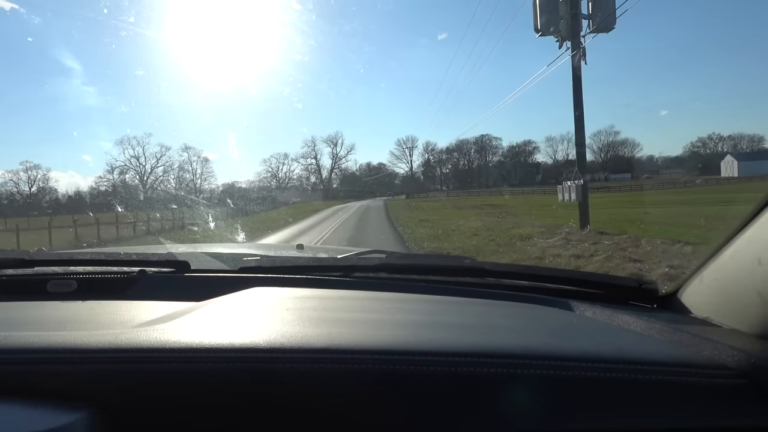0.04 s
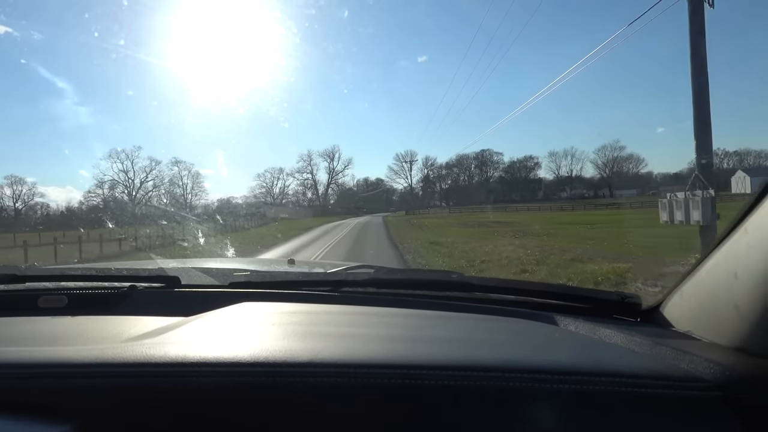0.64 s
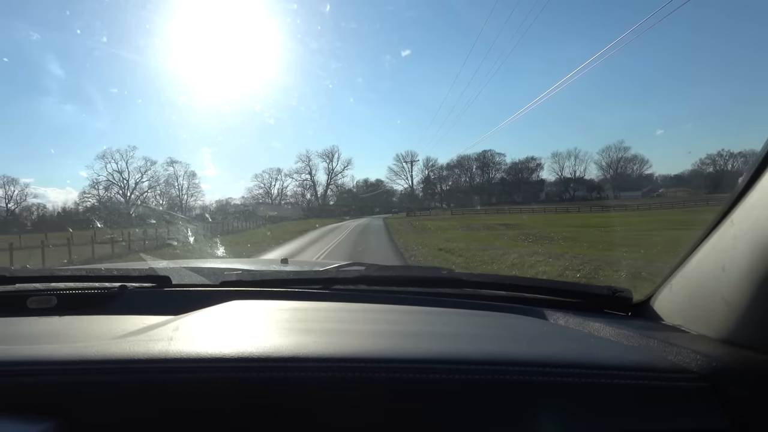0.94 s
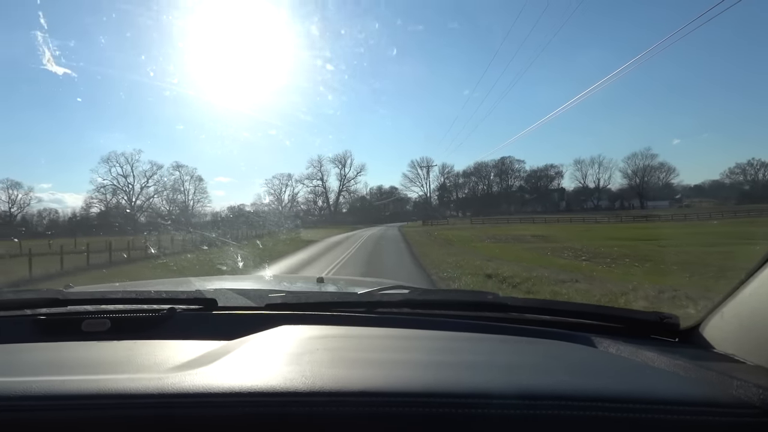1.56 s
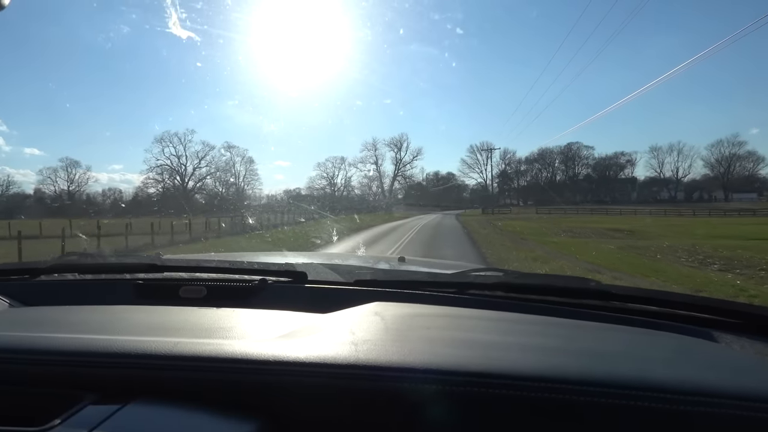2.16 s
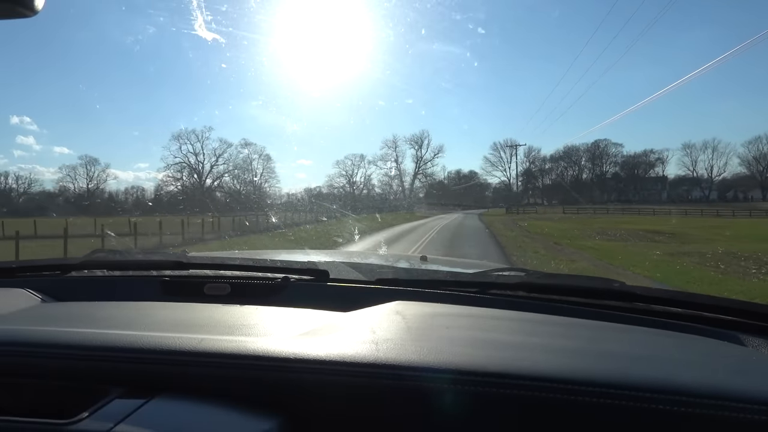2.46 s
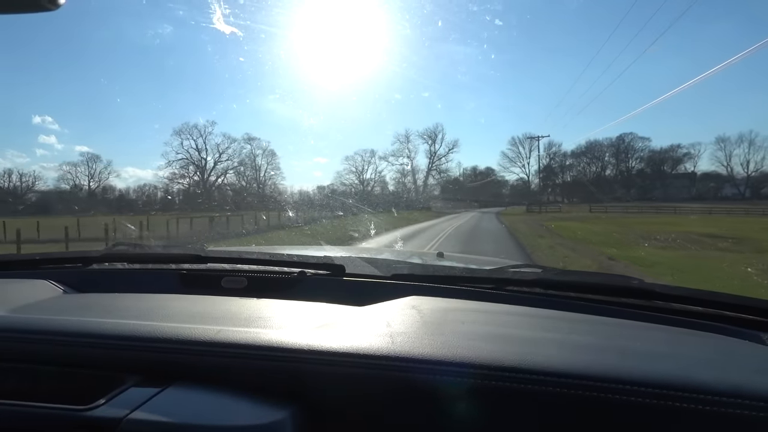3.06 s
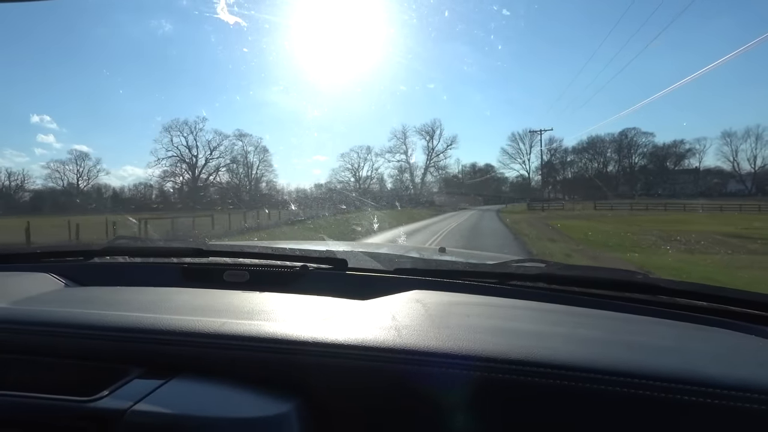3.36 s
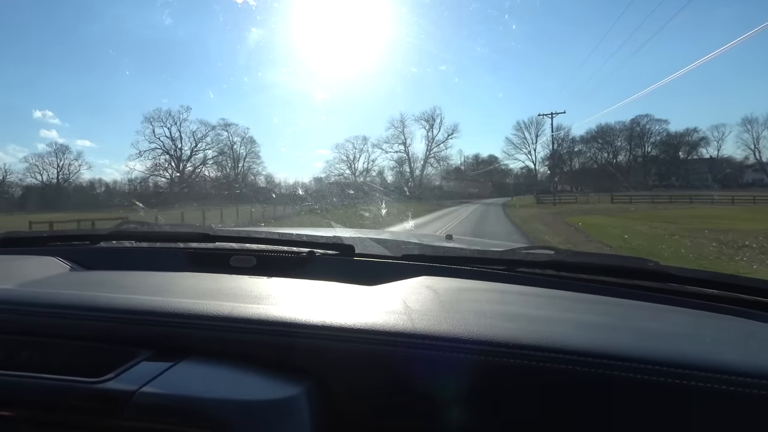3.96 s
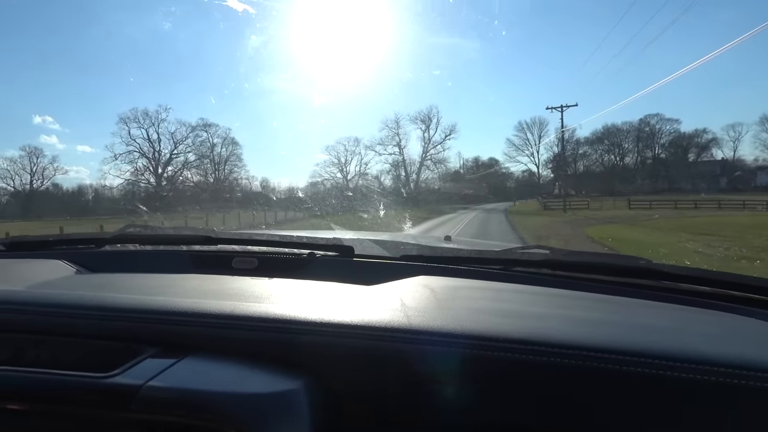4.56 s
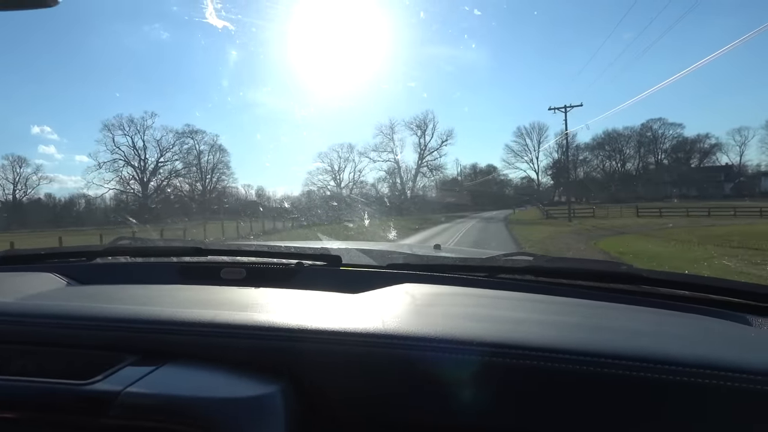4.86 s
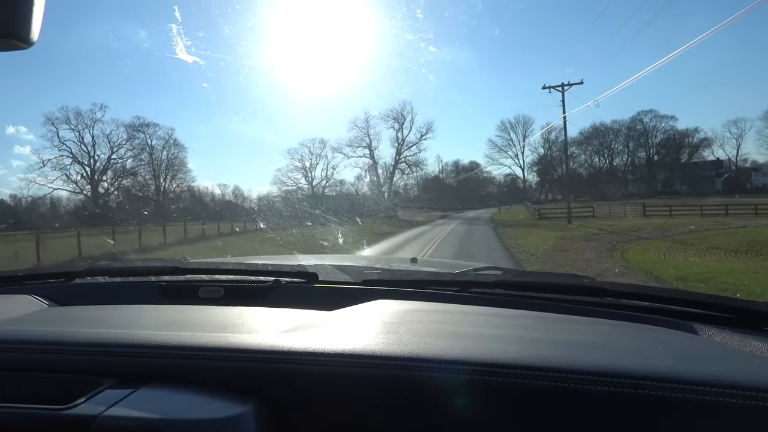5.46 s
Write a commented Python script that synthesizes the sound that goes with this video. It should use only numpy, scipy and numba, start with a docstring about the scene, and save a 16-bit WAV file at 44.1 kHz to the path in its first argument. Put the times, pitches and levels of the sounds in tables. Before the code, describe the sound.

A diesel pickup drones inside the cab, swelling to a loud exhaust boom as the revs climb, then dropping back over road rumble.

```python
"""The exhaust of a six-cylinder diesel pickup, heard inside the cab on a country road. It drones at the
firing rate and its harmonics, booms as the engine speeds up, and drops away as the revs fall. The firings
also excite diesel clatter and ringing covers and panels. Around them are road rumble, intake hiss, a thin
gear whine, a few knocks of loose trim and one rasping whoosh of air from the turbo.
An automatic gain control ducks all of this under the boom."""
import sys
import numpy as np
from scipy import signal
from scipy.fft import rfft, irfft
from scipy.io import wavfile
from numba import njit

SR = 44100
rng = np.random.default_rng(int(sys.argv[2]) if len(sys.argv) > 2 else 0)


def to_wav(sig):
    """Store sig (one row per channel, or 1-D mono) as 16-bit WAV at the path in sys.argv[1].

    Samples outside -1..1 are clipped; the rate is SR.
    """
    pcm = np.clip(np.atleast_2d(sig), -1, 1) * 32767
    pcm = np.round(pcm).astype(np.int16)
    wavfile.write(sys.argv[1], SR, pcm.T)  # frames by channels


N = 251811
TIME = np.arange(N) / SR
FREQ = np.maximum(np.arange(N // 2 + 1) * SR / N, 1)


def undb(db):
    """Decibels to amplitude ratio."""
    return 10 ** (np.asarray(db) / 20)


def curves(table):
    """Linear interpolation in time of each column after the first."""
    time_s, *columns = np.transpose(table)
    return [np.interp(TIME, time_s, column) for column in columns]


def over_hz(table):
    """Linear interpolation on a log-frequency axis."""
    hz, value = np.transpose(table)
    return np.interp(np.log(FREQ), np.log(hz), value)


def walk(cutoff_hz):
    """Low-pass Gaussian noise of unit variance."""
    noise = irfft(rfft(rng.standard_normal(N)) / (1 + (FREQ / cutoff_hz) ** 4), N)
    return (noise - noise.mean()) / noise.std()


def burst(start_s, rise_s, fall_s, hold_s=0):
    """Envelope: exponential growth to 1 at start_s, a hold, then exponential decay."""
    age = TIME - start_s
    return np.exp(np.minimum(0, np.minimum(age / rise_s, (hold_s - age) / fall_s)))


def resonances(modes):
    """Modal superposition: the summed frequency response of damped resonances."""
    return sum(undb(db) / (1 + 2j * (FREQ - hz) / width) ** 2 for hz, width, db in modes)


def cab_noise(response, drive=1):
    """Partial coherence: filtered noise of rms 1; reflections off the glass make left and right differ."""
    # likeness of the two channels: frequency_hz, correlation
    likeness = [(60, 0.9), (250, 0.74), (500, 0.73), (1000, 0.5), (4000, 0.97), (8000, 0.29), (14000, .5)]
    correlation = over_hz(likeness)
    mid, side = rfft(rng.standard_normal((2, N)) * drive)
    stereo = mid * np.sqrt(1 + correlation) + side * np.sqrt(1 - correlation) * np.array([[1], [-1]])
    noise = irfft(response * stereo, N)
    return noise / noise.std()


def road(level_db=-20.5, bumps_db=-0.5, tread_share=0.36):
    """Rolling noise: the tread roar gets louder after 2 s; rumble from uneven tarmac partly follows it."""
    # floor rumble spectrum: frequency_hz, relative_db
    rumble_spectrum = [(12, -16.5), (25, -1), (40, -5), (55, -7), (80, 0), (120, -0.5), (160, -3.5),
                       (215, -1), (290, -10), (500, -19), (1500, -49.5), (9000, -55), (15000, -70.5)]
    # tyre tread spectrum: frequency_hz, relative_db
    tread_spectrum = [(200, -5), (310, -1.5), (410, -2), (490, -0.5), (580, -6.5), (700, -4), (900, -7),
                      (1080, -1.5), (1200, -6.5), (1310, -4.5), (1450, -15), (2400, -32), (4600, -13),
                      (6500, -33), (14000, -58)]
    # tread noise envelope: time_s, level_db
    rolling = [(0, -42), (1.6, -46.5), (2.6, -30), (3.9, -32.5), (4.8, -26), (5.71, -31.5)]
    tread_db = curves(rolling)[0]
    rumble_db = level_db + tread_share * (tread_db - tread_db.mean()) + bumps_db * walk(4.0)
    rumble = undb(rumble_db) * cab_noise(undb(over_hz(rumble_spectrum)))
    return rumble + undb(tread_db) * cab_noise(undb(over_hz(tread_spectrum)))


def road_swell(level_db=-29, centre_hz=1020, width_hz=420):
    """Band-pass noise: the roar of the road swells briefly in the middle register."""
    envelope = burst(start_s=1.53, rise_s=.03, fall_s=0.059)
    return undb(level_db) * envelope * cab_noise(resonances([(centre_hz, width_hz, 0)]))


def intake_hiss(firings, level_db=-35, pulsing=0.065, flicker_db=0.7):
    """Flow noise in the intake, amplitude-modulated by the cylinders, with thin resonances on top."""
    # rushing air spectrum: frequency_hz, relative_db
    hiss_spectrum = [(1000, -5.5), (2200, -12.5), (2750, -4.5), (3100, -0.5), (3600, 2), (5000, 2.5),
                     (5900, -6.5), (7000, -7.5), (10500, -12.5), (12500, -17), (14000, -17), (16000, -27)]
    # slow drift of the hiss: time_s, relative_db
    airflow = [(0, -0.5), (.9, 0), (1.7, 0.1), (3.0, -0.5), (4.2, -1), (5.0, 0.5), (5.71, 0.5)]
    # metallic rings of the engine and an airy band of the intake: centre_hz, width_hz, level_db
    rings = [(3440, 40, -57.5), (3720, 37, -54), (4550, 70, -57), (6750, 700, -61), (10480, 650, -59.5)]
    drive = (1 + pulsing * np.cos(2 * np.pi * firings)) * undb(curves(airflow)[0] + flicker_db * walk(27))
    hiss = undb(level_db) * cab_noise(undb(over_hz(hiss_spectrum)), drive)
    ring_response = sum(undb(db) / np.sqrt(width) / (1 + (2 * (FREQ - hz) / width) ** 2)
                        for hz, width, db in rings)
    ring_rms = np.sqrt(sum(undb(db) ** 2 for _, _, db in rings))
    return hiss + ring_rms * cab_noise(ring_response)


def gear_whine(jitter_hz=7, flicker_db=2.0, fringe_db=-9, fringe_hz=70):
    """Gear meshing: one wavering tone with airy noise sidebands, strongest around 3 s."""
    # driveline tone: time_s, pitch_hz, level_db
    mesh = [(0, 5206, -84.5), (2.3, 5225, -58), (2.65, 5245, -58), (3.0, 5302, -44.5), (3.3, 5284, -46),
            (3.6, 5282, -53), (4.33, 5279, -51.5), (4.62, 5256, -56), (5.05, 5273, -51), (5.71, 5242, -59)]
    hz, db = curves(mesh)
    phase = 2 * np.pi * np.cumsum(hz + jitter_hz * walk(77)) / SR
    fringe = undb(fringe_db) * (walk(fringe_hz) * np.sin(phase) + walk(fringe_hz) * np.cos(phase))
    return undb(db + flicker_db * walk(16)) * (np.sqrt(2) * np.sin(phase) + fringe)


def trim_knocks(ring_s=0.0081, tick_db=-9, tick_s=0.004):
    """Impact excitation: loose trim strikes the dashboard, each time with a dull tick and a damped ring."""
    # faint impacts: start_s, pitch_hz, level_db
    knocks = [(2.708, 850, -19), (2.748, 2025, -28), (2.798, 740, -17), (2.813, 703, -19),
              (2.842, 1400, -26), (2.857, 690, -15.5), (2.880, 2005, -28)]
    out = 0
    for start_s, hz, db in knocks:
        age = np.maximum(TIME - start_s, 0)
        tick = undb(tick_db) * (age > 0) * np.exp(-age / tick_s) * walk(2000)
        ring = np.exp(-age / ring_s) * np.sin(2 * np.pi * hz * age)
        out = out + undb(db) * (ring + tick)
    return out


def turbo_whoosh(firings, pulsing=0.15, grit_db=1.1, leak_db=-33.0, leak_jet_db=-41, jet_delay_s=0.018):
    """Jet noise: spurts of air that end brighter, over a softer leak, chopped by firings and turbulence."""
    # body of the escaping air: frequency_hz, relative_db
    body_spectrum = [(1200, -35), (2300, -8), (2850, -2), (3550, 5.5), (4200, 0), (4700, 0.5), (5700, -22),
                     (7200, -12), (12000, -32)]
    # its bright jet: frequency_hz, relative_db
    jet_spectrum = [(3000, -9), (5000, -2.5), (7200, 6.5), (8500, -0.5), (10500, -3), (12500, -10),
                    (15500, -29)]
    # spurts from the turbo: start_s, length_s, body_db, jet_db
    spurts = [(1.75, 0.025, -33, -46), (1.833, 0.016, -23, -31.5), (1.885, 0.015, -27, -33),
              (1.93, .014, -35, -48.5)]
    drive = (1 + pulsing * np.cos(2 * np.pi * firings)) * undb(grit_db * walk(350))
    leak = burst(start_s=1.947, rise_s=0.35, fall_s=0.076)
    body_envelope, jet_envelope = undb(leak_db) * leak, undb(leak_jet_db) * leak
    for start_s, length_s, body_db, jet_db in spurts:
        body_envelope += undb(body_db) * burst(start_s, rise_s=0.0039, fall_s=0.013, hold_s=length_s)
        jet_s = start_s + jet_delay_s
        jet_envelope += undb(jet_db) * burst(jet_s, rise_s=0.0046, fall_s=0.0064, hold_s=length_s)
    body = body_envelope * cab_noise(undb(over_hz(body_spectrum)), drive)
    return body + jet_envelope * cab_noise(undb(over_hz(jet_spectrum)), drive)


def firing_pulses(firings, decay_cycles, scatter_db):
    """Impulsive excitation: one exponentially decaying pulse of random strength per firing."""
    strength = undb(scatter_db * rng.standard_normal(N))[firings.astype(int)]
    return strength * np.exp(-(firings % 1) / decay_cycles)


def ringing_metal(firings, scatter_db=2.5):
    """Modal response: each firing makes the engine covers rasp and the panels ring."""
    # cover modes: centre_hz, width_hz, relative_db
    cover_modes = [(2756, 150, -2), (2406, 190, -8.5), (3890, 93, -3.5)]
    # their rasp: time_s, level_db
    cover_level = [(0, -50), (.45, -43.5), (1.3, -43), (2.1, -47), (2.6, -48.5), (4.6, -50), (5.71, -47)]
    # panel modes: centre_hz, width_hz, relative_db
    panel_modes = [(690, 55, -1), (1092, 100, -3.5), (1311, 58, -1), (1790, 190, -12)]
    # their ring, strongest as the engine pulls again at low revs: time_s, level_db
    panel_level = [(0, -50), (1.5, -43.5), (4.3, -43.5), (4.9, -33.5), (5.71, -31)]
    out = 0
    for modes, level, decay_cycles in (cover_modes, cover_level, 0.54), (panel_modes, panel_level, 0.45):
        drive = firing_pulses(firings, decay_cycles, scatter_db)
        out = out + undb(curves(level)[0]) * cab_noise(resonances(modes), drive)
    return out


def diesel_clatter(firings, level_db=-25.0, steady=2.0, crank_swing=0.03):
    """Combustion noise: each firing knocks the block, with a strength that varies round the crank."""
    # clatter spectrum: frequency_hz, relative_db
    clatter_spectrum = [(150, 0.5), (300, -6), (420, -5.5), (570, -6.5), (700, -2), (880, -8.5), (1130, -8),
                        (1500, -12.5), (2200, -18), (4000, -25), (9000, -55)]
    pulses = firing_pulses(firings, decay_cycles=0.76, scatter_db=1.5)
    crank = np.cos(2 * np.pi * firings / 3)  # three firings to a turn
    drive = (steady + pulses) * (1 + crank_swing * crank)
    return undb(level_db) * cab_noise(undb(over_hz(clatter_spectrum)), drive)


def engine_block(firings, firing_hz, waver_db=1.5, wander_rad=.18, off_resonance_db=-24):
    """Forced vibration: unequal cylinders shake the block at crank orders that swell at cab resonances."""
    # orders and the resonances they meet: crank_multiple, resonance_hz, width_hz, level_db
    crank_orders = [(2, 55, 33, -34), (4, 87, 34, -36), (4.5, 180, 15, -37), (6, 160, 7.3, -30.5),
                    (5, 170, 66, -36), (7, 183.2, 30, -23.5), (7.5, 191, 20, -30), (7.5, 235.3, 10, -22.5),
                    (8, 204, 13, -32.5), (10, 251, 14, -31), (12, 309, 42, -35), (12, 357, 12.94, -26),
                    (15, 400, 64, -30), (16, 420, 120, -37.5), (17, 430, 46, -36.5), (18, 421, 58, -33.5),
                    (18, 497, 58, -33.5), (21, 615, 45, -34.5), (24, 660, 140, -41.5)]
    amplitudes = {}
    for multiple, resonance_hz, width_hz, db in crank_orders:
        ratio = multiple / 3  # to the firing rate
        detuning = 2 * (ratio * firing_hz - resonance_hz) / width_hz
        response = undb(off_resonance_db) + 1 / (1 + detuning ** 2)
        amplitudes[ratio] = amplitudes.get(ratio, 0) + undb(db) * response
    out = 0
    for ratio, amplitude in amplitudes.items():
        waver = undb(waver_db * walk(3.0))
        phase = 2 * np.pi * (ratio * firings + rng.random()) + wander_rad * walk(3.9)
        out = out + amplitude * waver * np.sin(phase)
    return out


def pipe_boom(firing_hz, lag_s=0.028):
    """Threshold response: each exhaust harmonic's level in dB climbs once the firing rate is high enough."""
    # one row per harmonic: quiet_db, booming_db, threshold_hz, softness_hz, trend_db_per_hz
    harmonics = [(-18, 3.5, 83.42, 1.93, -0.3179), (-19, -6.5, 81.2, 0.5, 0.5139), (-39, -21, 80.4, 0.3, 0)]
    delayed_hz = np.interp(TIME - lag_s, TIME, firing_hz)
    levels_db = []
    for quiet_db, booming_db, threshold_hz, softness_hz, trend in harmonics:
        above_hz = delayed_hz - threshold_hz
        rise_db = (booming_db - quiet_db) / (1 + np.exp(-above_hz / softness_hz))
        levels_db.append(quiet_db + rise_db + trend * above_hz)
    return levels_db


def exhaust(firings, firing_hz, smooth_above_db=-13, slip_cycles=0.16, pipe_hz=85.9, width_hz=3.67):
    """Harmonic series: three partials of the firing rate; in the boom only the third stays rough."""
    # gain on the whole exhaust note: time_s, gain_db
    exhaust_gain = [(0, 1), (1.2, -0.5), (1.8, -0.5), (2.2, -0.7), (2.75, -2.1), (3.2, 0.2), (4.47, 0.37),
                    (4.55, -2), (4.62, 4), (5.0, 1.7), (5.71, 0.5)]
    levels_db = pipe_boom(firing_hz)
    low_roughness = 0.031 * np.minimum(1, undb(smooth_above_db - levels_db[0]))
    roughness = (low_roughness, low_roughness, 0.18)
    # the overtones slip in phase as the firing rate passes a resonance of the pipe
    slip = slip_cycles * (1 - 2 * np.exp(-((firing_hz - pipe_hz) / width_hz) ** 2))
    note = 0
    for harmonic, (db, depth) in enumerate(zip(levels_db, roughness), 1):
        phase = 2 * np.pi * (harmonic * firings + (harmonic - 1) * slip)
        note = note + undb(db) * (1 + depth * walk(30)) * np.sin(phase)
    return np.sqrt(2) * undb(curves(exhaust_gain)[0]) * note


def scene(speed_jitter=0.0016, left_lag_samples=4, whine_balance_db=-5):
    """Superposition at the dashboard: most sound reaches the right side first and louder."""
    # engine speed: time_s, firing_hz
    firing_rate = [(0, 80.14), (.12, 80.46), (.28, 72.9), (.65, 75.2), (1.15, 75.2), (2.0, 81.28),
                   (2.7, 86.1), (3.6, 91.8), (4.12, 94.4), (4.35, 94), (4.47, 88.5), (4.545, 80.55),
                   (4.61, 74.5), (4.85, 73.94), (4.97, 70.06), (5.71, 72.8)]
    # level of the block tones and clatter: time_s, gain_db
    engine_gain = [(0, -0.5), (1.9, 1.44), (3.5, 5), (4.8, 5), (5.71, 3)]
    # stereo balance: frequency_hz, left_minus_right_db
    balance = [(60, -2.5), (110, -1.4), (180, -1.5), (260, -3.5), (400, -5), (1200, -5), (2400, -3.5),
               (4400, -1.5), (8000, 0), (15000, -1.5)]
    firing_hz = curves(firing_rate)[0]
    firings = np.cumsum(firing_hz * (1 + speed_jitter * walk(7.3))) / SR  # phase in firing cycles
    engine = undb(curves(engine_gain)[0]) * (engine_block(firings, firing_hz) + diesel_clatter(firings))
    cab = engine + ringing_metal(firings) + exhaust(firings, firing_hz) + intake_hiss(firings)
    cab = cab + road() + road_swell() + turbo_whoosh(firings) + trim_knocks()
    sides = np.array([[.5], [-.5]])
    left, right = irfft(rfft(cab) * undb(over_hz(balance) * sides), N)
    left = np.pad(left, (left_lag_samples, 0))[:N]
    # the whine rises from the floor to both sides at once
    return np.array([left, right]) + gear_whine() * undb(whine_balance_db * sides)


@njit
def follow_peaks(magnitude, peak, attack, release):
    """Envelope detection: a quick rise, then decay by a fixed factor each sample."""
    out = np.empty(len(magnitude))
    for i in range(len(magnitude)):
        peak = peak + (magnitude[i] - peak) * attack if magnitude[i] > peak else peak * release
        out[i] = peak
    return out


def record(dry, ceiling_db=-4.0, start_db=-3, attack_s=0.0012, recovery_db_per_s=5.5, top_hz=15600):
    """Automatic gain control holds peaks near a ceiling and recovers slowly; a low-pass cuts the top."""
    release = float(undb(-recovery_db_per_s / SR))
    peak = follow_peaks(np.abs(dry).max(axis=0), float(undb(start_db)), 1 / (attack_s * SR), release)
    held = dry * np.minimum(1, undb(ceiling_db) / peak)
    return signal.sosfilt(signal.ellip(8, .2, 80, top_hz, fs=SR, output="sos"), held)


dry = scene()
out = record(dry)
to_wav(out)
```